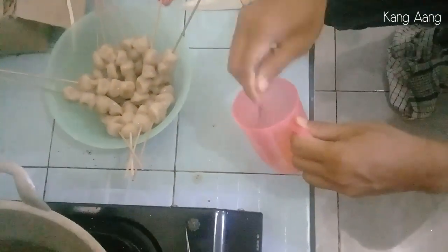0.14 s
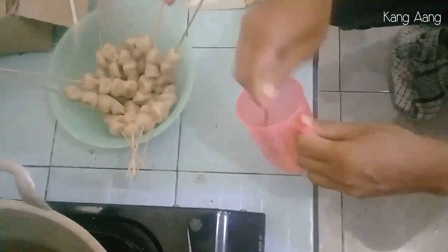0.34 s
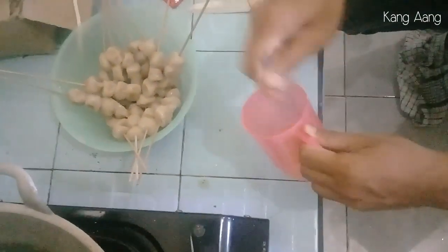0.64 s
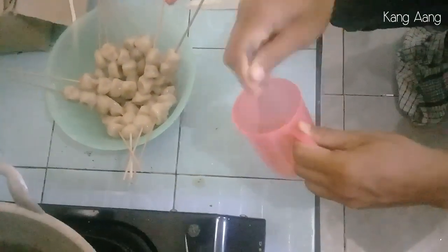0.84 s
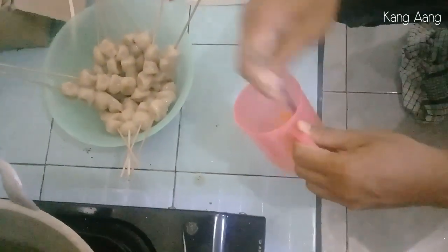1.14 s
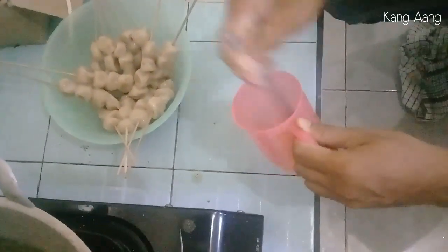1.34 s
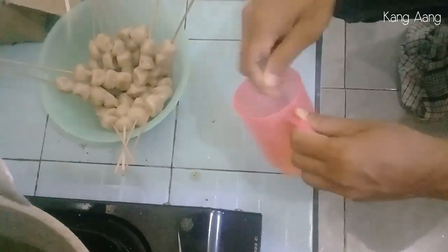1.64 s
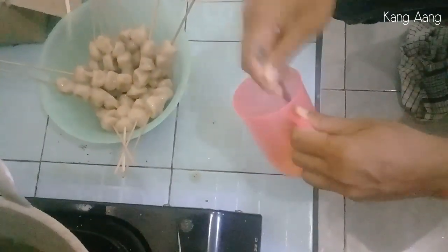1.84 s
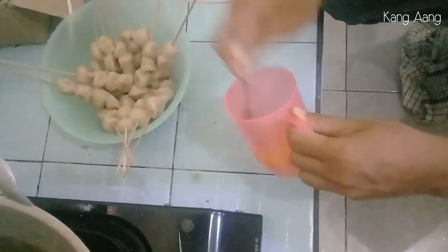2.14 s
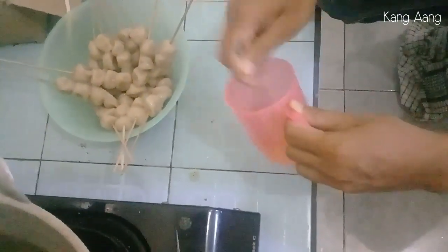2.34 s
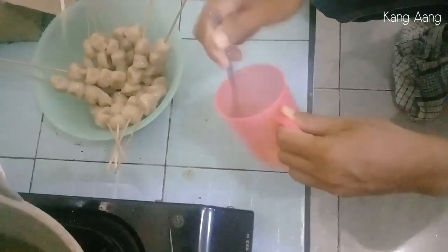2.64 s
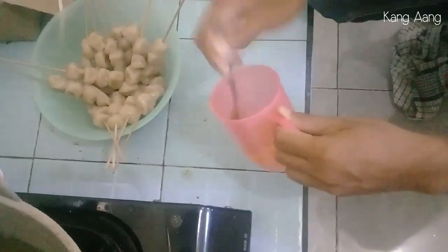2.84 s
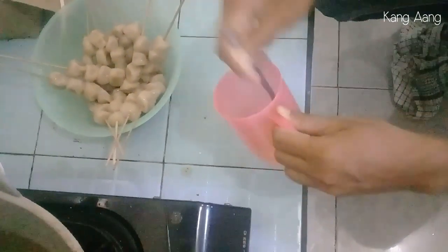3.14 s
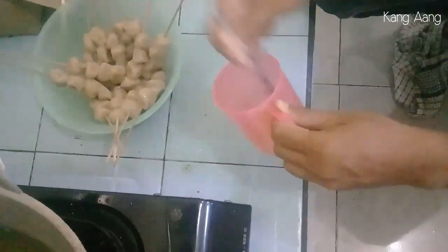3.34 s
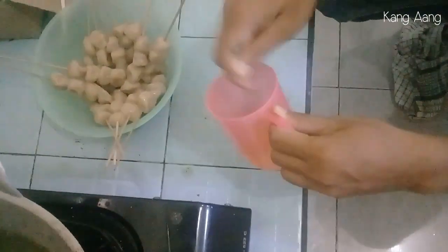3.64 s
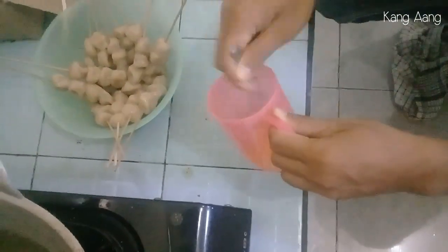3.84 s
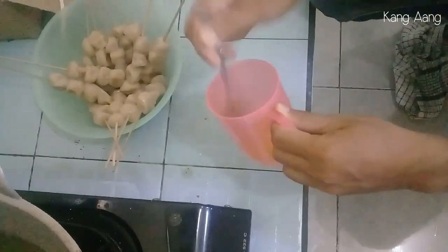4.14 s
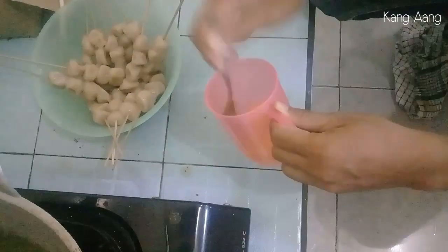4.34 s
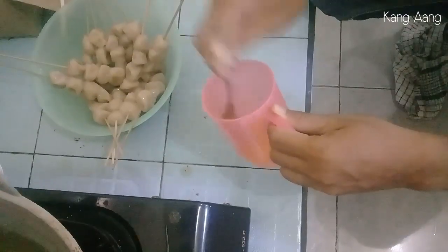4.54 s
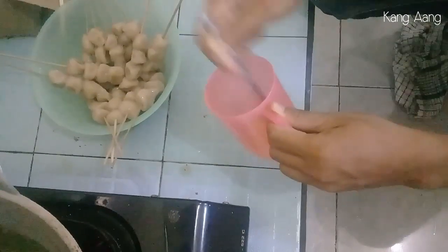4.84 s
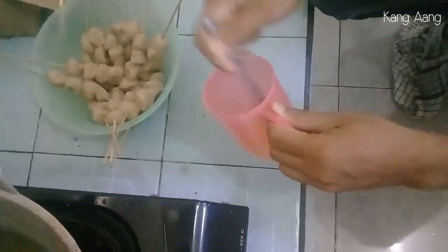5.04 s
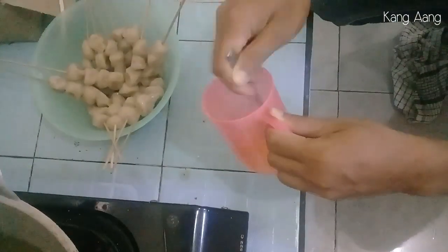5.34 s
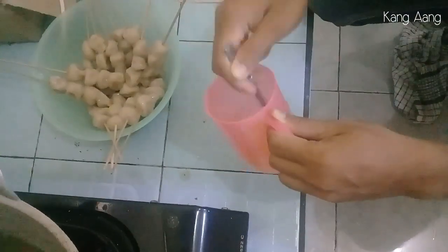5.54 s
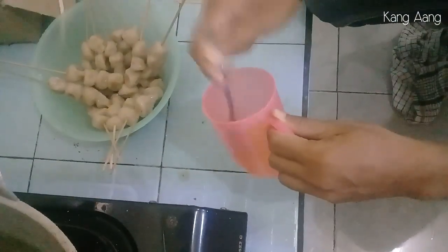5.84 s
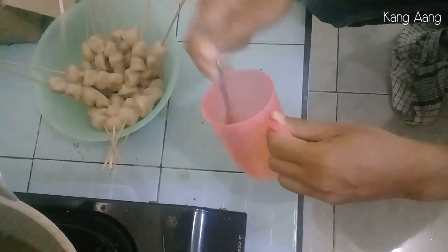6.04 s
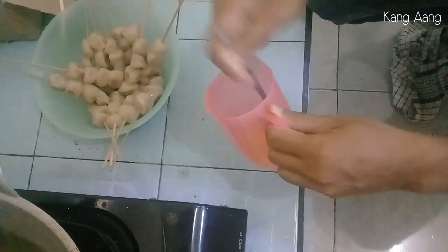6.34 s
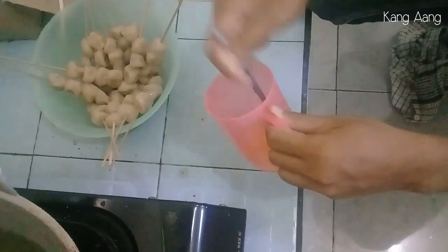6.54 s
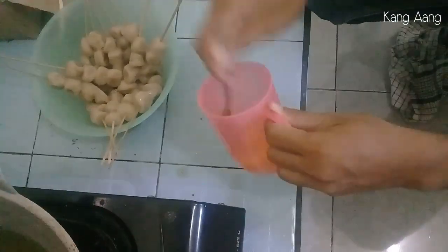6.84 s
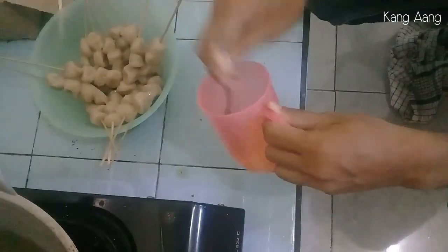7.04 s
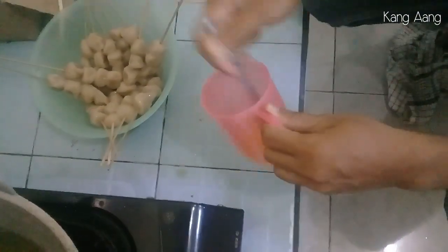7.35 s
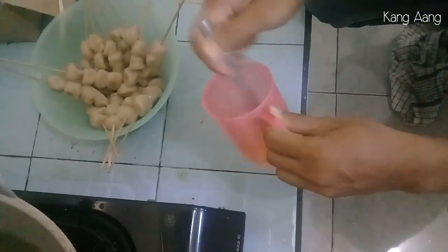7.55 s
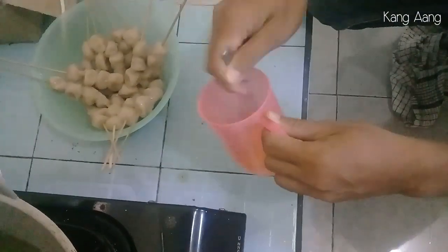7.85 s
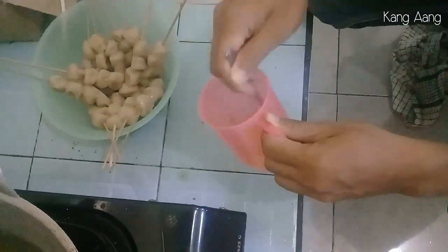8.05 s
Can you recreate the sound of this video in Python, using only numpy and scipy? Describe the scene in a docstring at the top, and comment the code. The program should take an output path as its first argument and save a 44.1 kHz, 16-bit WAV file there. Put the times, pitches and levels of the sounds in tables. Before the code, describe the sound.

A metal fork beats a raw egg in a plastic mug, close by, from the very start. The first strokes are uneven, with one sharp clack, a wet gulp and a brief metallic ring at about 0.2 seconds. By 1 second the beating settles into a steady rhythm of about five strokes a second. Each stroke is a small wet smack followed by a hard plastic clack, a hollow note from the mug and a dull thud. The egg squelches softly between blows, gulping near 1.1, 1.8 and 5.7 seconds. Sharper hits land around 3.1 and 6.1 seconds, and the fork rings briefly near 6.1 and 6.7 seconds. From about 7 seconds the strokes get lighter, continuing until the end just after 8 seconds. A small tiled kitchen adds a short echo to every stroke, over a quiet room tone.

```python
"""A metal fork beats a raw egg in a hand-held plastic mug, about five strokes a second, lighter
towards the end. In each stroke the fork dips into the egg with a smack, then clacks the wall, rings
the air in the mug and thuds its base. The egg squelches between the blows and now and then gulps.
A small tiled kitchen rings on after every stroke, over a quiet room tone."""
import sys
import numpy as np
from scipy import signal
from scipy.fft import rfft, irfft
from scipy.io import wavfile
from scipy.ndimage import uniform_filter1d

SR = 44100
rng = np.random.default_rng(int(sys.argv[2]) if len(sys.argv) > 2 else 0)


def persist_wave(psi):
    """Save psi, clipped to +-1, as 16-bit WAV."""
    counts = np.round(np.clip(psi, -1, 1) * 32767).astype(np.int16)
    wavfile.write(sys.argv[1], SR, np.atleast_2d(counts).T)


N = 360738

# room tone spectrum: f/Hz, level/dB
ROOM_TONE_EQ = [(25, -35), (65, 6), (120, 4), (250, 7.5), (600, -1), (1500, -8.5), (4000, -7.5),
                (10000, -18.5), (16000, -24)]
# standing waves between the tiles: f/Hz, level/dB, t60/s
ROOM_MODES = [(140, 1, 0.98), (281.5, 10.5, 0.88), (360, -25, 0.17), (666, -8, 0.26), (702, -3.5, 0.29)]
# tone of the echoes off the tiles: f/Hz, level/dB
TILE_EQ = [(60, 0.5), (300, -6), (700, 3), (1200, -2), (2800, -4), (5000, 0.5), (9000, -12.5), (16000, -3)]
# the kitchen's decay: f/Hz, t60/s
KITCHEN_DECAY = [(100, 0.45), (700, 0.49), (2500, 0.53), (6000, 0.51), (14000, 0.55)]

# how hard the egg is churned: t/s, level/dB
CHURN_LEVEL = [(0, -56.5), (.12, -72.5), (.4, -55.5), (.9, -66.5), (2.5, -60.5), (4.8, -59.5), (5.6, -70),
               (6.7, -64), (7.7, -61.5), (8.18, -63.5)]
# wet tone of tearing egg: f/Hz, level/dB
SQUELCH_EQ = [(100, 9), (400, 13), (570, -17), (700, 22.5), (1000, 14.5), (2400, 11), (3100, 21.5),
              (4200, -1.5), (8000, 0.5), (10000, -2.5), (12000, -1.5), (13400, -20), (15500, -28)]
# tone of the fine spray of thrown egg: f/Hz, level/dB
SPRAY_EQ = [(1500, 18), (4000, -12.5), (7500, 0), (10000, -4), (12000, -5.5), (13500, -9), (15500, 0)]
# big pockets of air torn open by the fork: t/s, f/Hz, level/dB
GULP_CUES = [(.212, 860, -21), (1.108, 1130, -29), (1.834, 840, -23), (5.724, 800, -28), (5.922, 930, -38)]
# note of the air in the mug, shifting as the egg heaps up and settles: t/s, f/Hz
MUG_NOTE = [(.21, 715), (.93, 686), (1.35, 742), (1.7, 692.7), (3.5, 702), (5.5, 692), (6.7, 705),
            (7.1, 730), (8.04, 737)]

# modes of the base, damped by the egg and the hand: f/Hz, level/dB, t60/s
BASE_MODES = [(90.5, -23, 0.028), (168, -20, 0.019), (296, -4.5, 0.025), (370, 2, 0.025),
              (432, -1.5, 0.025), (514, -3.5, 0.021)]
# modes of the plastic wall with the fork against it: f/Hz, level/dB, t60/s
WALL_MODES = [(920, 4, 0.021), (1066, -10, 0.043), (1293, -13, 0.12), (1483, -1.5, 0.023),
              (1684, -5, 0.032), (2007, 2, 0.0032), (2055, 0.5, 0.02), (2292, -2, 0.015), (2411, 2, 0.021),
              (2690, -6, 0.014), (2753, -10.5, 0.023), (2895, -2.5, 0.038), (2966, -8, 0.034),
              (3650, -9, 0.008), (3710, -1, 0.024)]
# tone of steel ticking on plastic: f/Hz, level/dB
TICK_EQ = [(800, -1), (3000, 8), (4300, -4.5), (6000, -5), (8300, -4.5), (9500, -9.5), (12000, -11),
           (13500, -20), (16000, -23)]
# modes of the steel fork: f/Hz, level/dB, t60/s
FORK_MODES = [(2830, 5, 0.16), (2990, -11, 0.2)]
# the fork springs free of the wall and rings on: t/s, level/dB
FORK_RING_CUES = [(0.212, -24.5), (3.091, -44), (6.135, -34.5), (6.688, -27.5)]
# blows of the fork on the mug: t/s, wall level/dB, wall centre f/Hz, air level/dB
BLOW_CUES = [(.041, -41.5, 2450, -47.5), (.152, -38, 2290, -48), (.211, -19, 2300, -27),
             (.341, -32.5, 2480, -36), (.437, -38.5, 2270, -36), (.53, -39.5, 2370, -44),
             (.574, -35, 2840, -61), (.625, -41, 2450, -37), (.702, -26, 2080, -26.5),
             (.749, -26, 2200, -24.5), (.929, -23.5, 2460, -23), (1.106, -25, 1570, -26),
             (1.283, -24.5, 1960, -22.5), (1.308, -25.5, 2470, -21.5), (1.462, -20.5, 1990, -26),
             (1.486, -22, 2220, -27.5), (1.641, -20, 1760, -21.5), (1.833, -25.5, 2120, -33),
             (1.975, -32.5, 2100, -29.5), (2.006, -20.5, 2130, -23.5), (2.19, -21, 2070, -26.5),
             (2.359, -29.5, 2080, -30), (2.374, -19, 1740, -25.5), (2.42, -29, 2400, -34),
             (2.55, -21.5, 1960, -24.5), (2.721, -25, 1800, -31.5), (2.906, -25, 2110, -25),
             (3.092, -15.5, 2740, -37), (3.287, -20.5, 2200, -23.5), (3.477, -25.5, 2050, -22),
             (3.664, -25, 2100, -25), (3.847, -29, 2150, -23.5), (4.035, -22, 2330, -23.5),
             (4.208, -32.5, 2400, -34), (4.222, -28, 1950, -29), (4.409, -21.5, 2180, -23.5),
             (4.451, -38, 2350, -39), (4.596, -22, 2310, -28.5), (4.782, -24.5, 2030, -25),
             (4.974, -29, 2600, -43.5), (5.162, -20.5, 2020, -25.5), (5.346, -22.5, 2030, -31),
             (5.533, -20.5, 2140, -33), (5.721, -29.5, 2500, -39), (5.74, -24, 2340, -71),
             (5.92, -25.5, 2480, -74), (6.095, -24.5, 2100, -32), (6.121, -30, 2650, -55),
             (6.133, -17.5, 2340, -45), (6.305, -33.5, 2690, -34.5), (6.324, -44, 2010, -26.5),
             (6.336, -21, 2420, -35), (6.441, -34, 2170, -34.5), (6.495, -25.5, 2640, -25.5),
             (6.676, -33.5, 1850, -32.5), (6.69, -22.5, 2560, -33), (6.876, -27, 2580, -31.5),
             (7.072, -31.5, 2220, -33), (7.081, -33.5, 2680, -41), (7.268, -35, 2100, -29.5),
             (7.274, -25, 2360, -31), (7.469, -32, 2750, -46), (7.649, -35, 2230, -31.5),
             (7.656, -30, 2660, -45), (7.849, -33, 2860, -56.5), (8.042, -29, 2230, -35)]

RING_T = np.arange(int(.25 * SR)) / SR  # time axis of one hit, in seconds


def undb(db):
    """Decibels to amplitude."""
    return 10 ** (np.asarray(db) / 20)


def rms(x):
    """Average amplitude, never zero."""
    return np.sqrt(np.mean(x ** 2)) + 1e-12


def attack_level(x, db, span):
    """Scale a sound so that its first span seconds sit at db."""
    return x * undb(db) / rms(x[:int(span * SR)])


def at_time(curve, s):
    """Read a curve at time s."""
    return np.interp(s, *np.transpose(curve))


def at_frequency(curve, hz):
    """Read a curve along a log-frequency axis."""
    f, value = np.transpose(curve)
    return np.interp(np.log(np.maximum(hz, 1)), np.log(f), value)


def colour(x, eq):
    """Minimum-phase EQ, so that attacks stay sharp."""
    size = 4096
    gain_db = at_frequency(eq, np.arange(size // 2 + 1) * SR / size)
    cepstrum = irfft(gain_db * np.log(10) / 20)
    cepstrum[1:size // 2] *= 2
    cepstrum[size // 2 + 1:] = 0
    return signal.fftconvolve(x, irfft(np.exp(rfft(cepstrum))))[:len(x)]


def add(track, s, sound):
    """Lay a sound on a track at time s."""
    i = max(int(s * SR), 0)
    part = sound[:max(len(track) - i, 0)]
    track[i:i + len(part)] += part


def wander(rate, count=1):
    """Smooth random modulation curves, with about rate turns a second."""
    step = int(SR / rate)
    held = np.repeat(rng.standard_normal((count, N // step + 1)), step, axis=1)[:, :N]
    return uniform_filter1d(held, step, axis=1)


def ring(hz, gain, t60):
    """Damped modes ringing out after one push."""
    t = RING_T[RING_T < t60.max()]
    modes = gain[:, None] * np.sin(2 * np.pi * hz[:, None] * t) * undb(-60 * t / t60[:, None])
    return np.pad(modes.sum(0), (0, len(RING_T) - len(t)))


def room_tone(level_db):
    """The quiet, steady air of the house."""
    noise = colour(rng.standard_normal(N), ROOM_TONE_EQ)
    return noise / rms(noise) * undb(level_db)


def standing_waves(x, gain_db):
    """A few low notes hum on between the walls."""
    t = np.arange(SR) / SR
    response = 0
    for hz, db, t60 in ROOM_MODES:
        fade = undb(-60 * t / t60)
        response = response + undb(db + gain_db) * 2 * fade / fade.sum() * np.sin(2 * np.pi * hz * t)
    return signal.fftconvolve(x, response)[:N]


def kitchen_reverb(x, wet_db, predelay, build_up):
    """Dense echoes off the tiles, dying away in about half a second."""
    t = np.arange(int(.9 * SR)) / SR
    hz, age, cells = signal.stft(rng.standard_normal(len(t)), SR, nperseg=256)
    fade = undb(-60 * age / at_frequency(KITCHEN_DECAY, hz)[:, None])
    tail = signal.istft(cells * fade, SR)[1][:len(t)]
    tail *= 1 - np.exp(-np.maximum(t - predelay, 0) / build_up)
    tail /= np.sqrt(np.sum(tail ** 2))
    return signal.fftconvolve(x, undb(wet_db) * colour(tail, TILE_EQ))[:N]


def bubble(hz, cycles, glide):
    """A pocket of air rings with a brief, rising, heavily damped note."""
    age = np.linspace(0, 1, int(cycles * SR / hz) + 2)
    phase = 2 * np.pi * cycles * age * (1 + glide * age / 2)
    return np.sin(phase) * np.sqrt(age) * undb(-50 * age)


def bubbles(per_s, low_hz, high_hz, cycles, glide, spread_db, gain_db):
    """Air beaten into the egg, in bubbles of every size."""
    out = np.zeros(N)
    for when, pitch, size in rng.random((int(per_s * N / SR), 3)):
        hz = low_hz * (high_hz / low_hz) ** pitch
        add(out, when * N / SR, undb(spread_db * size) * bubble(hz, cycles, glide))
    return out / rms(out) * undb(gain_db)


def tearing_films(grains_per_s, grain_db, clump_db, gain_db):
    """Films of egg tear in clumps of tiny pops."""
    sizes = undb(grain_db * np.minimum(rng.exponential(size=N), 5)) * rng.standard_normal(N)
    clumps = undb(clump_db * np.tanh(wander(rate=70)[0]))
    triggers = rng.random(N) < grains_per_s / SR
    pops = colour(sizes * clumps * triggers, SQUELCH_EQ)
    return pops / rms(pops) * undb(gain_db)


def splash_envelope(lag, width):
    """Egg thrown up by each blow falls back a moment later, never quite on time; 0 to 1."""
    splash = np.zeros(N)
    for s, wall_db, *_ in BLOW_CUES:
        late = lag + .013 * rng.uniform(-1.06, 1)
        add(splash, s, undb(wall_db * 0.56) * np.exp(-((RING_T - late) / width) ** 2))
    return np.tanh(2 * splash / splash.max())


def churning_egg():
    """The wet bed: tears, squelches and plops swell after each blow, then spray patters down."""
    churn = undb(at_time(CHURN_LEVEL, np.arange(N) / SR))
    tearing = tearing_films(grains_per_s=5000, grain_db=2.0, clump_db=5.5, gain_db=8)
    squelches = bubbles(per_s=70, low_hz=1703, high_hz=3035, cycles=29, glide=0.12,
                        spread_db=25, gain_db=9.5)
    plops = bubbles(per_s=10, low_hz=327, high_hz=593, cycles=10.5, glide=0.12,
                    spread_db=10, gain_db=-10)
    froth = bubbles(per_s=1800, low_hz=4000, high_hz=14600, cycles=16, glide=0.17,
                    spread_db=11, gain_db=18)
    spray = colour(froth, SPRAY_EQ) * splash_envelope(lag=0.0896, width=0.0058)
    flicker = undb(2.7 * np.tanh(wander(rate=160)[0]))
    swell = 1 + 3 * splash_envelope(lag=0.034, width=0.05)
    return churn * ((tearing + squelches + plops) * swell + spray * flicker)


def gulps(cycles, glide):
    """Now and then the fork tears open a big pocket of air, pitched above the mug's own note."""
    out = np.zeros(N)
    for s, hz, db in GULP_CUES:
        add(out, s, attack_level(bubble(hz, cycles, glide), db, span=.01))
    return out


def mug_air(hz, t60, rise, bend, bend_time):
    """The air above the egg swings up to a hollow note that bends upward as the egg is pushed aside."""
    glide = bend * rng.uniform(0, 2.46) * (.75 - np.exp(-RING_T / bend_time))
    phase = 2 * np.pi * np.cumsum(hz * (1 + glide)) / SR
    note = np.sin(phase) * undb(-60 * RING_T / t60) * (1 - np.exp(-RING_T / rise))
    return signal.sosfilt(signal.butter(2, 560, "highpass", fs=SR, output="sos"), note)


def glances(within_s=.035):
    """Flag the blows with another close behind: these only glance off the wall."""
    return np.diff(np.transpose(BLOW_CUES)[0], append=np.inf) < within_s


def sloshes(lag, gain_db, pitch_ratio):
    """As the fork lifts, the egg falls back and sounds the air again, softer and a little higher."""
    out = np.zeros(N)
    for s, _, _, air_db in np.array(BLOW_CUES)[~glances()]:
        hz = at_time(MUG_NOTE, s) * pitch_ratio
        note = mug_air(hz, t60=0.19, rise=0.0097, bend=0.032, bend_time=0.034)
        add(out, s + lag * rng.uniform(.85, 1.15), attack_level(note, air_db + gain_db, span=0.025))
    return out


def mug_jolt(hz, t60, rise):
    """A low bump as the whole mug is jolted in the hand."""
    swing = np.sin(2 * np.pi * hz * rng.uniform(0.8, 1.36) * RING_T)
    return swing * undb(-60 * RING_T / t60) * (1 - np.exp(-RING_T / rise))


def base_thud(detune, rise):
    """A dull knock from the bottom of the mug."""
    hz, db, t60 = np.transpose(BASE_MODES)
    detuned = hz * (1 + detune * rng.standard_normal(len(hz)))
    gain = undb(db) * rng.choice([-1, 1], len(hz))
    return ring(detuned, gain, t60) * (1 - np.exp(-RING_T / rise))


def tine_contacts(spread, rebound):
    """One tine lands firmly and the other three follow in a tight flam: lag/s, relative force."""
    lags = rng.uniform(.1, 1, 3) * spread
    return [(0, 1), *zip(lags, rebound * rng.uniform(0.45, 1, 3))]


def tine_tick(contacts, decay, scrape_db, scrape_decay):
    """Steel meets plastic with a sharp tick for each tine, then slides briefly."""
    pressure = undb(scrape_db) * np.exp(-RING_T / scrape_decay)
    for lag, force in contacts:
        add(pressure, lag, force ** 2 * np.exp(-RING_T / decay))
    return colour(pressure * rng.standard_normal(len(RING_T)), TICK_EQ)


def wall_clack(contacts, centre_hz, width_octaves, scatter_db, detune):
    """The spot struck favours the wall's modes near one pitch; grip and egg detune them a little."""
    hz, db, t60 = np.transpose(WALL_MODES)
    focus = 1 / (1 + (np.log2(hz / centre_hz) / width_octaves) ** 2)
    clack = np.zeros(len(RING_T))
    for lag, force in contacts:
        gain = force * focus * undb(db + scatter_db * rng.standard_normal(len(hz)))
        polarity = rng.choice([-1, 1], len(hz))
        detuned = hz * (1 + detune * rng.standard_normal(len(hz)))
        add(clack, lag, ring(detuned, gain * polarity, t60))
    # soft plastic radiates little outside its modes
    return signal.sosfilt(signal.butter(3, [750, 3800], "bandpass", fs=SR, output="sos"), clack)


def blow(wall_db, wall_hz, air_db, air_hz, glancing):
    """One hit in five layers; the tick and the thud follow its force."""
    force_db, push_db = wall_db + 21.5, air_db + 25.5  # relative to a typical firm blow
    tick_db = -33.5 + 0.62 * force_db
    thud_db = -28.5 + 0.14 * force_db + 0.49 * push_db - 13 * glancing  # a glance barely reaches the base
    contacts = tine_contacts(spread=.005, rebound=0.63)
    clack = wall_clack(contacts, wall_hz, width_octaves=0.41, scatter_db=2.5, detune=0.035)
    hollow = mug_air(air_hz, t60=0.058, rise=0.00026, bend=0.1, bend_time=0.018)
    thud = base_thud(detune=0.058, rise=0.0018)
    jolt = mug_jolt(hz=167.6, t60=0.077, rise=0.0035)
    tick = tine_tick(contacts, decay=0.0016, scrape_db=-8.5, scrape_decay=0.011)
    return (attack_level(clack, wall_db, span=0.012)
            + attack_level(hollow, air_db, span=0.026)
            + attack_level(thud, thud_db, span=0.0065)
            + attack_level(jolt, wall_db - 33, span=0.0097)
            + attack_level(tick, tick_db, span=0.014))


def smack(plop_hz, plop_db, squish_hz, squish_db, snap_db):
    """The dipping fork snaps the surface and traps one big pocket of air and three small ones."""
    snap = colour(rng.standard_normal(len(RING_T)) * np.exp(-RING_T / 0.0033), SPRAY_EQ)
    out = attack_level(snap, snap_db, span=0.0018)
    plop = bubble(plop_hz * rng.uniform(0.86, 1.176), cycles=7.3, glide=0.28)
    add(out, 0, attack_level(plop, plop_db, span=0.0065))
    for lag, size in rng.random((3, 2)):
        squish = bubble(squish_hz * (0.72 + 0.543 * size), cycles=22, glide=0.19)
        add(out, 0.0045 * lag, attack_level(squish, squish_db, span=0.0044))
    return out


def fork_dips(lead):
    """Just before a stroke lands, the fork smacks into the egg and softly knocks the mug."""
    out = np.zeros(N)
    times, wall_db = np.transpose(BLOW_CUES)[:2]
    landings = times[~glances()]
    opens_stroke = np.diff(times, prepend=0) > .1
    hard_glance = glances() & (wall_db > -29)  # no dip if the fork meets the wall hard on its way down
    for start in times[opens_stroke & ~hard_glance]:
        s = landings[landings >= start][0] - lead + .005 * rng.uniform(-1, 1)
        churn_db = at_time(CHURN_LEVEL, s)
        smack_db, knock_db = churn_db + 21, churn_db + 17
        wet = smack(plop_hz=488, plop_db=2, squish_hz=2360, squish_db=-4.5, snap_db=-8)
        knock = blow(knock_db, wall_hz=2190, air_db=knock_db, air_hz=at_time(MUG_NOTE, s), glancing=False)
        add(out, s, undb(smack_db) * wet + knock)
    return out


def skid(span, swell):
    """The tines skid along the wall just before they land, muffled by the egg."""
    t = np.arange(int(span * SR)) / SR
    rub = rng.standard_normal(len(t)) * np.exp((t - span) / swell)
    wet_rub = colour(np.pad(rub, (0, len(t))), SQUELCH_EQ)
    return signal.sosfilt(signal.butter(3, 3000, fs=SR, output="sos"), wet_rub)


def fork_strokes(skid_s):
    """The fork skids into each blow, louder the more egg it pushes, and at times springs free and rings."""
    out = np.zeros(N)
    for (s, wall_db, wall_hz, air_db), glancing in zip(BLOW_CUES, glances()):
        add(out, s - skid_s, attack_level(skid(skid_s, swell=0.0028), air_db - 14, span=skid_s))
        add(out, s, blow(wall_db, wall_hz, air_db, at_time(MUG_NOTE, s), glancing))
    hz, db, t60 = np.transpose(FORK_MODES)
    for s, ring_db in FORK_RING_CUES:
        add(out, s, attack_level(ring(hz, undb(db), t60), ring_db, span=0.011))
    return out


def scene():
    """Fork, egg and mug up front, the tiled kitchen around them."""
    mug = fork_strokes(skid_s=0.0079) + fork_dips(lead=0.036) + gulps(cycles=24, glide=.25)
    mug += sloshes(lag=.08, gain_db=-15.5, pitch_ratio=1.05) + churning_egg()
    # hand and mug keep moving, so the echoes shift: an equal-power drift between four reverbs
    sends = wander(rate=5, count=4)
    sends /= np.sqrt(np.sum(sends ** 2, axis=0))
    room = sum(kitchen_reverb(mug * send, wet_db=-2, predelay=0.0063, build_up=0.0015) for send in sends)
    return (mug + room + standing_waves(mug, gain_db=-1.5) + room_tone(level_db=-57))[None]


def record(dry):
    """Roll off the deep bass, round the loudest peaks and cut the top."""
    ceiling, top_hz = 0.8, 16000
    thin = signal.sosfilt(signal.butter(3, 56, "highpass", fs=SR, output="sos"), dry)
    rounded = ceiling * np.tanh(thin / ceiling)
    return signal.sosfilt(signal.ellip(8, .2, 70, top_hz, fs=SR, output="sos"), rounded)


dry = scene()
out = record(dry)
persist_wave(out)
```